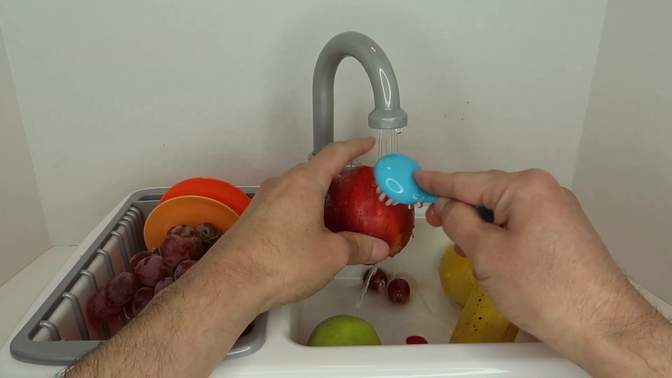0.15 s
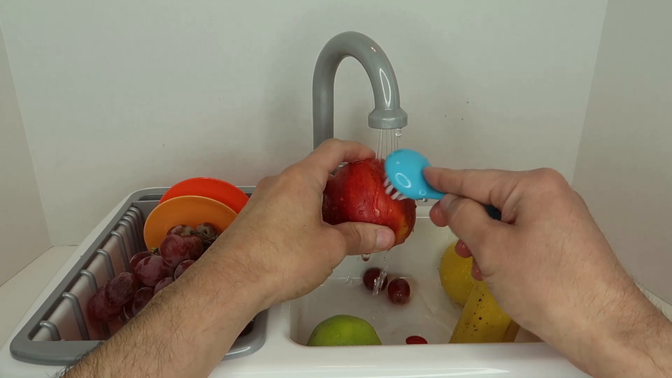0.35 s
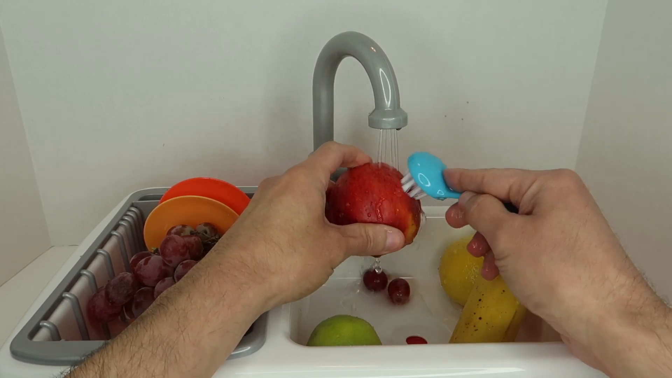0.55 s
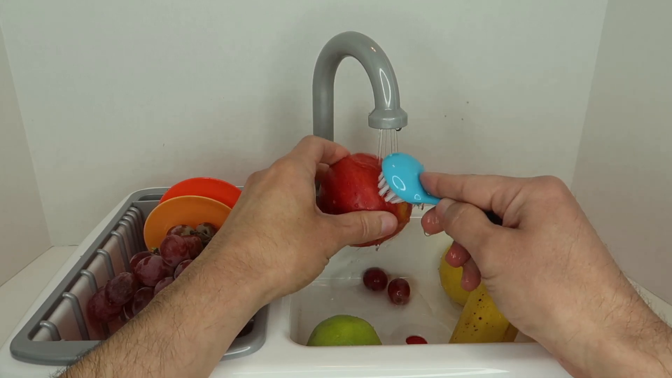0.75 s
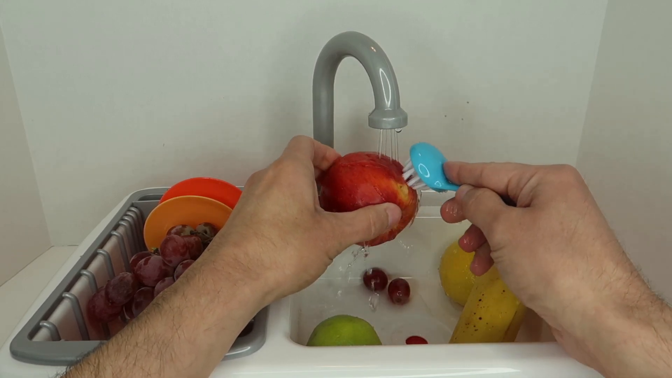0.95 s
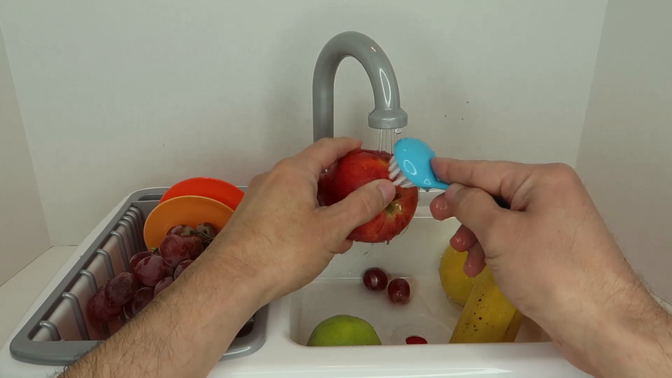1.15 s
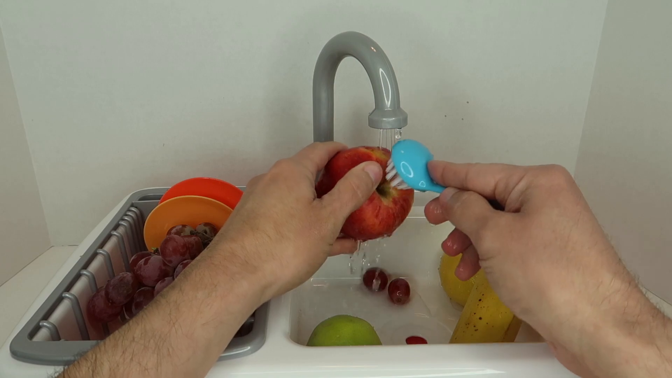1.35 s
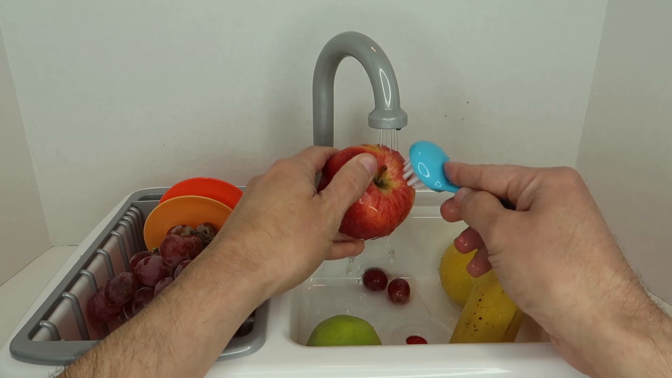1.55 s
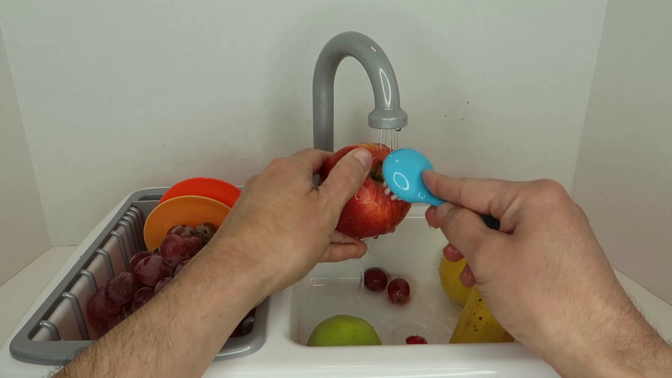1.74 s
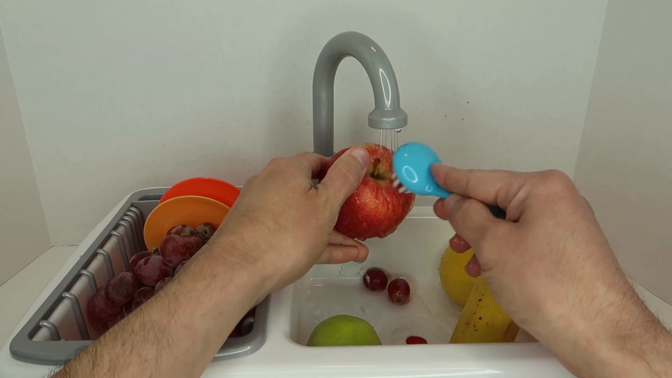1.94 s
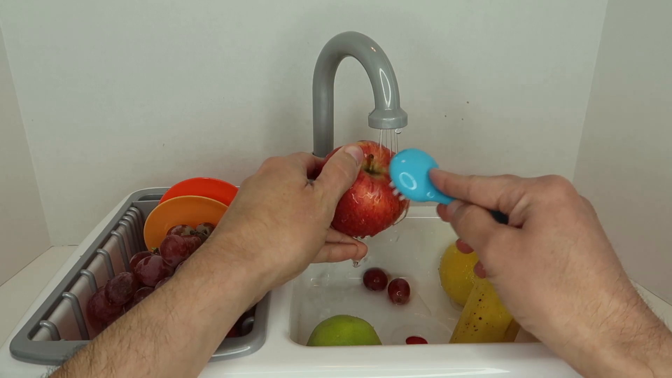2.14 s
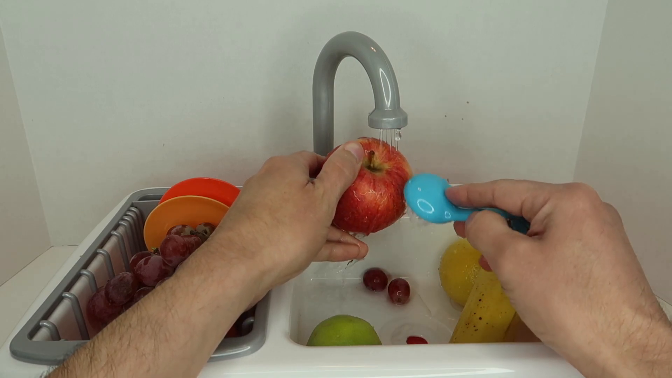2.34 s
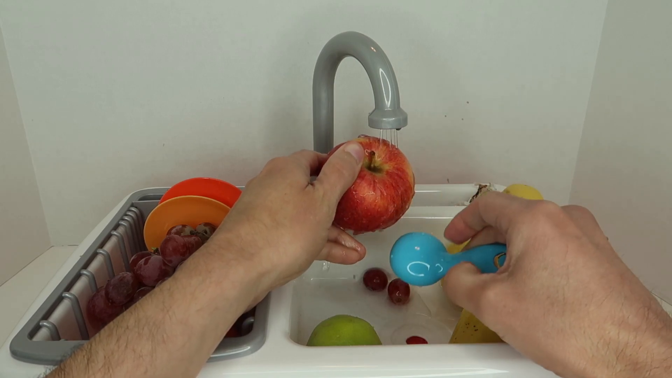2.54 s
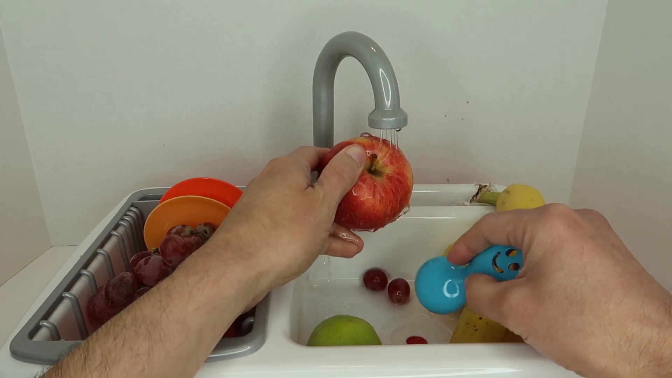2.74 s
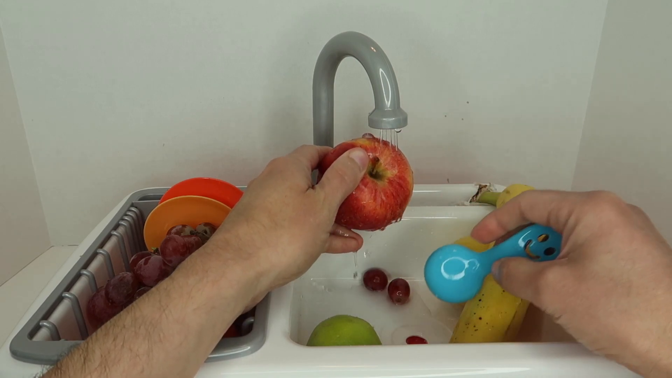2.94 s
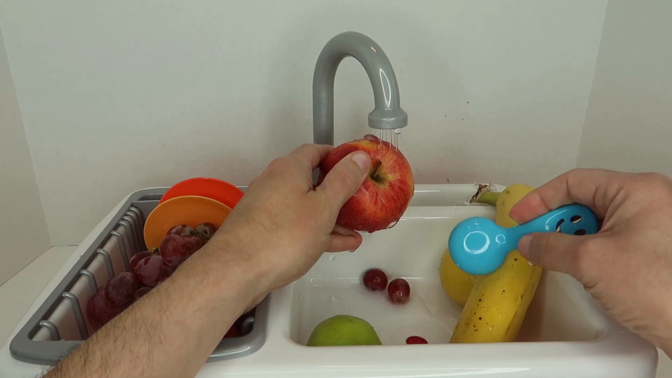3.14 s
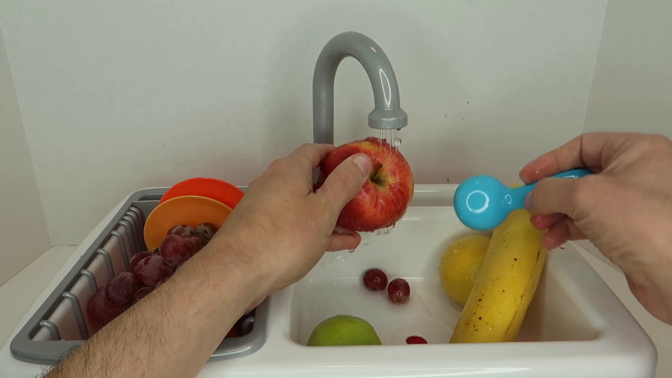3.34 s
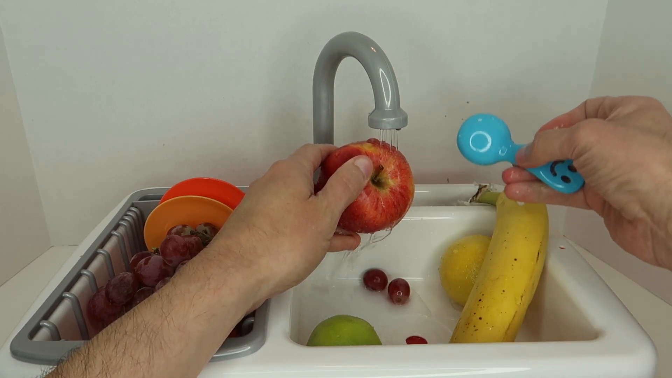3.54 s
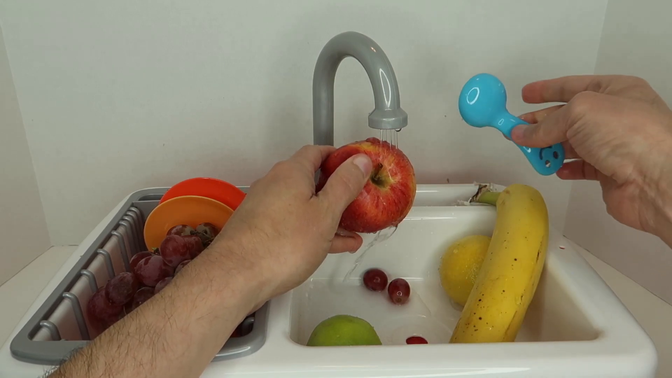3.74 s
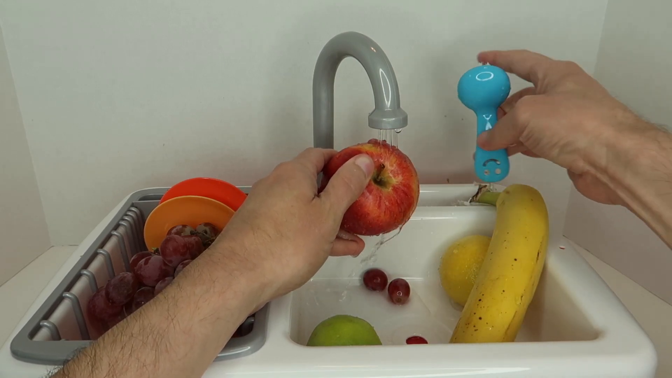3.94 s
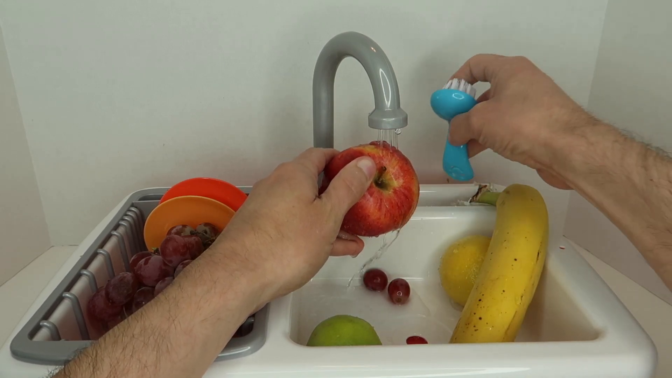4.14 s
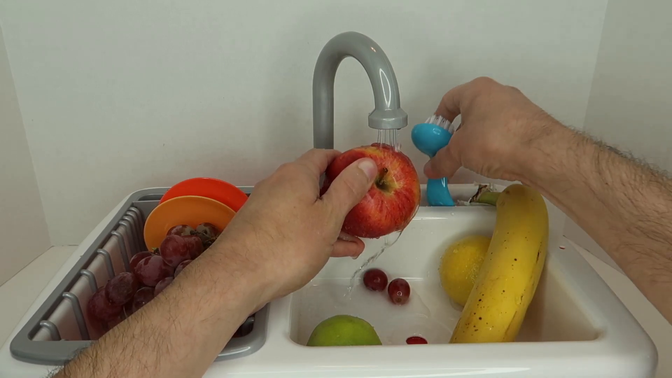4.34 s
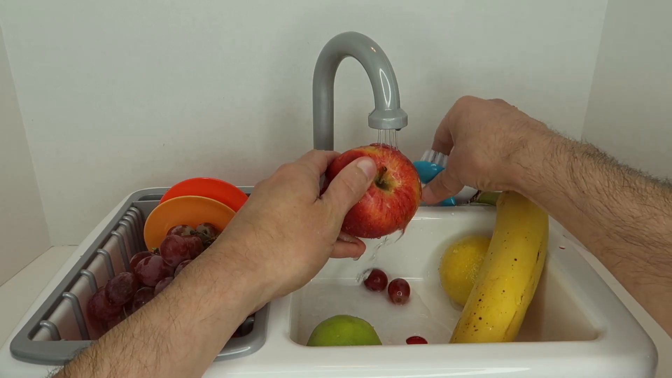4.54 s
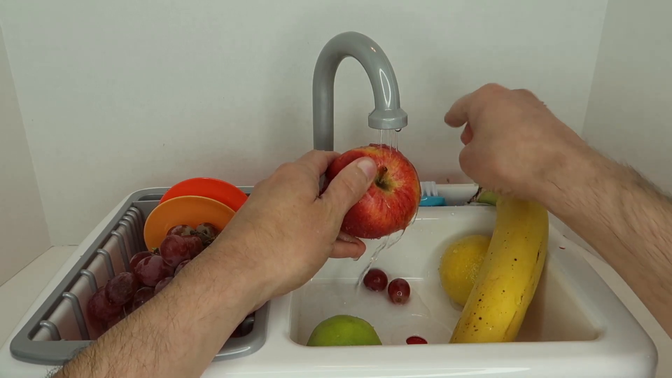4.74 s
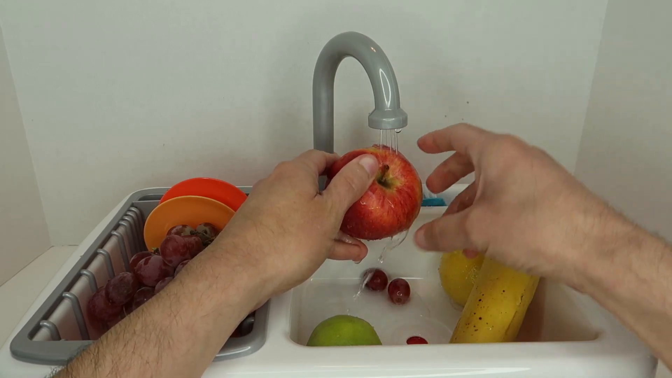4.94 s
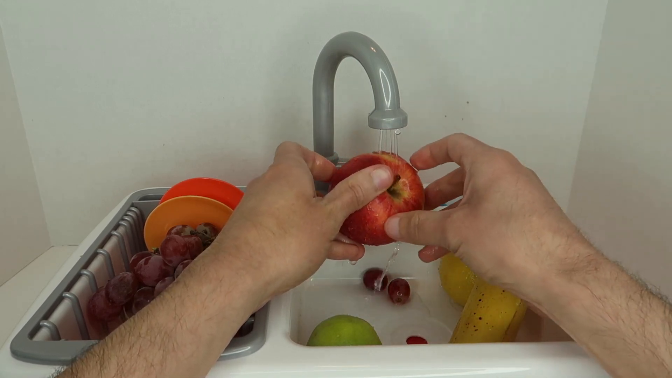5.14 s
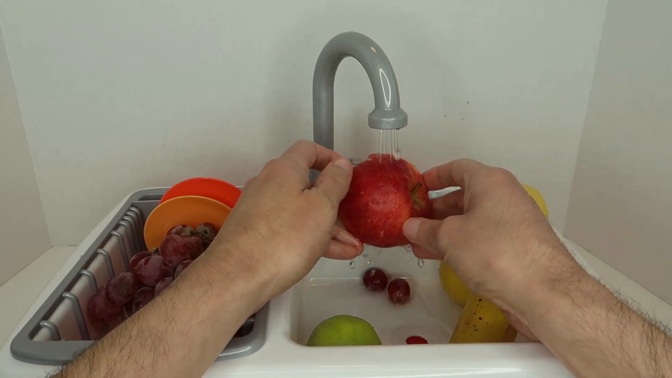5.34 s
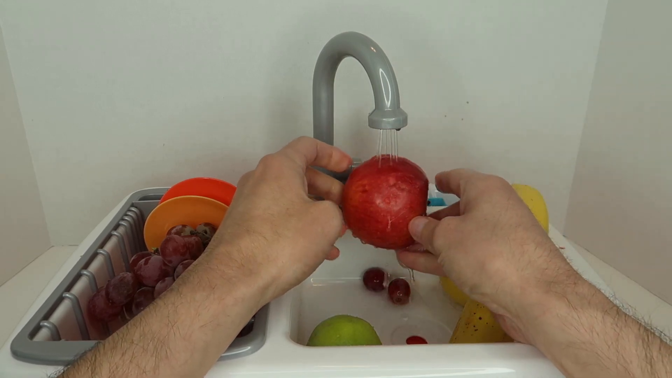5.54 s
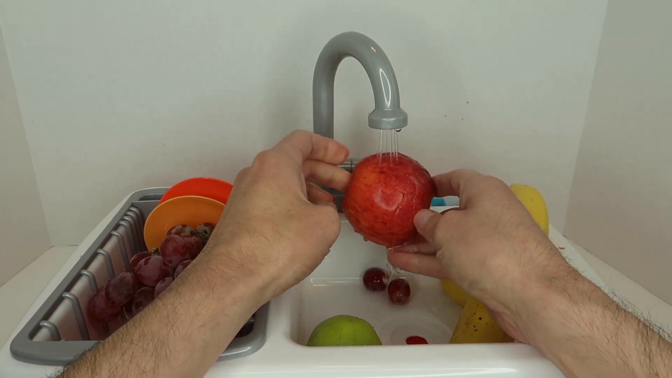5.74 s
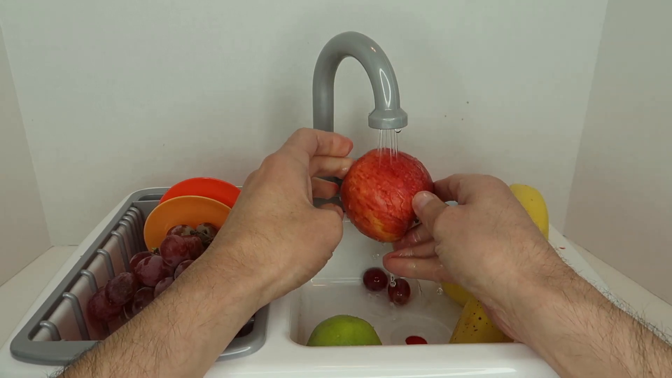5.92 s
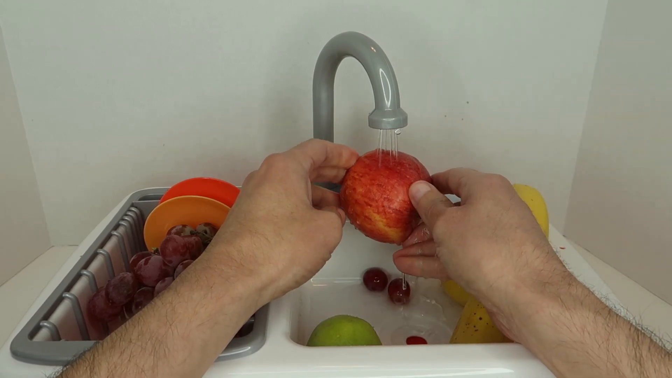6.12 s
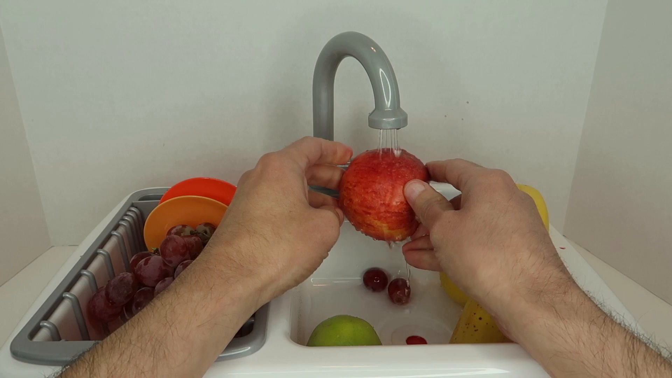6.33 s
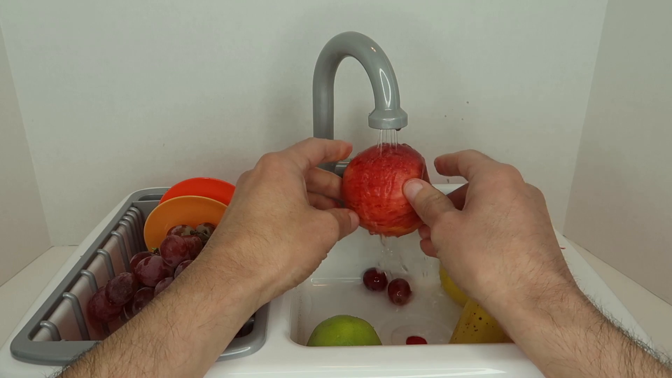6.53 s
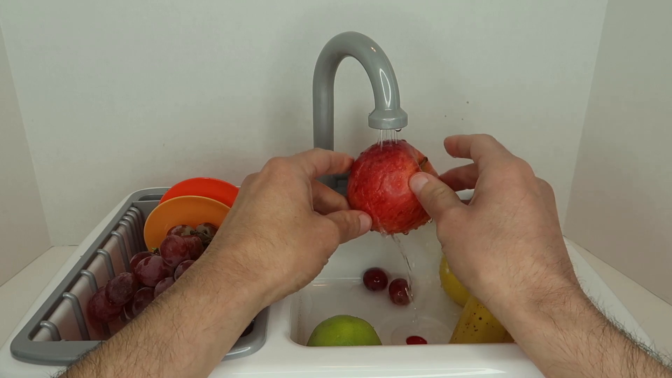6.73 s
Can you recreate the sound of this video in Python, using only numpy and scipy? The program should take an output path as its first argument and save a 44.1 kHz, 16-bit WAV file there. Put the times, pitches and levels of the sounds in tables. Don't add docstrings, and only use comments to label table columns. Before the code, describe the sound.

Quick bristly rasps over a constant little motor buzz and faint water fizz, followed by low rumbles, a loud hollow plastic clack and sparse drips.

```python
import sys
import numpy as np
from scipy import signal
from scipy.fft import rfft, irfft
from scipy.io import wavfile
from scipy.ndimage import uniform_filter1d

SR = 44100
rng = np.random.default_rng(int(sys.argv[2]) if len(sys.argv) > 2 else 0)


def boost_factor(decibels):
    exponent = np.asarray(decibels, float) / 20
    return 10 ** exponent


def bounce(signal):
    frames = np.transpose(np.atleast_2d(signal))
    limited = np.clip(frames, -1, 1)
    pcm = np.round(limited * 32767).astype(np.int16)
    wavfile.write(sys.argv[1], SR, pcm)


N = 303408
TIME = np.arange(N) / SR


def evened(x):
    return x / np.sqrt(np.mean(x ** 2) + 1e-20)


def read(points, hz):
    f, value = np.transpose(points)
    return np.interp(np.log(hz + 1), np.log(f + 1), value)


def level(rows):
    s, db = np.transpose(rows)
    return boost_factor(np.interp(TIME, s, db, left=-120, right=-120))


def swells(rows, rise_db, fall_s, fall_db):
    t = TIME[::40]
    power = np.zeros(len(t))
    for s, db, rise_s in rows:
        slope = np.where(t < s, rise_db / rise_s, -fall_db / fall_s)
        power += boost_factor(2 * (db + slope * (t - s)))
    return np.interp(TIME, t, np.sqrt(power))


def drift(top_hz):
    t = TIME[::200]
    rates = np.geomspace(top_hz / 20, top_hz, 16)
    slow = sum(np.sin(2 * np.pi * (f * t + rng.random())) / np.sqrt(f) for f in rates)
    return np.interp(TIME, t, evened(slow))


def colour(x, points):
    n = x.shape[-1]
    return evened(irfft(rfft(x) * boost_factor(read(points, np.fft.rfftfreq(n, 1 / SR))), n))


def ring(x, hz, width):
    r = np.exp(-np.pi * width / SR)
    return 2 * signal.lfilter([1 - r], [1, -r * np.exp(2j * np.pi * hz / SR)], x).real


def grains(per_s, spread_db):
    size = boost_factor(spread_db * np.minimum(rng.exponential(1, N), 5))
    size = size * (rng.random(N) < per_s / SR)
    return size * rng.standard_normal((2, N))


def patchy(x, depth_db, bins, frames):
    z = signal.stft(x, nperseg=512, noverlap=384)[2]
    patches = uniform_filter1d(rng.standard_normal(z.shape[1:]), bins, 0)
    patches = uniform_filter1d(patches, frames, 1)
    z = z * boost_factor(depth_db * evened(patches))
    return signal.istft(z, nperseg=512, noverlap=384)[1][:, :N]


def add(mix, s, sound):
    part = mix[..., round(s * SR):][..., :sound.shape[-1]]
    part += sound[..., :part.shape[-1]]


# f/Hz, likeness/0-1
LIKENESS = [(30, 1), (70, 0.91), (150, 0.96), (400, 0.82), (1000, 0.85), (2400, 0.75), (6000, 0.31),
            (15000, 0.026)]


def pair(noise, points=LIKENESS):
    z = rfft(noise)
    same = np.clip(read(points, np.fft.rfftfreq(N, 1 / SR)), 0, 1)
    mid = np.sqrt((1 + same) / 2) * z[0]
    side = np.sqrt((1 - same) / 2) * z[1]
    return irfft(np.array([mid + side, mid - side]), N)


# t/s, lead/turns
SHAFT_LEAD = [
    (0.0, 0.034),
    (1.7, 0.021),
    (3.55, 0.112),
    (5.0, 0.036),
    (6.1, 0.016),
    (6.9, 0.021),
]
# multiple of shaft speed, level/dB
PUMP_TONES = [(8, -60), (9, -61), (11, -65), (12, -58), (14, -67), (15, -58), (16, -50), (17, -61),
              (18, -61), (20, -71), (21, -60), (22, -67), (24, -65), (25, -70), (26, -63), (27, -63),
              (29, -70), (31, -64), (32, -70), (35, -69), (36, -67), (51, -67), (57, -64)]
# place/turns, strength/dB, brightness/dB
PUMP_STROKES = [
    (.09, 1, 1),
    (.15, -2, 0),
    (.25, -1, -10),
    (.34, -5, -9),
    (.45, -4, -3),
    (.51, -3, -4),
    (.59, -5, -12),
    (.79, -5, -11),
]
# f/Hz, width/Hz, level/dB
HOUSING_MODES = [(729, 180, -3.5), (1039, 250, -1), (1230, 77, -3), (1470, 143, 2), (1606, 57, -3.5),
                 (1662, 122, -0.5), (1974, 264, -1), (2877, 290, -7.5), (3194, 200, -8.5),
                 (3950, 790, -5.5), (4590, 260, -10), (5590, 780, -8.5), (6860, 410, -20.5)]


def pump():
    shaft_hz, knocking_db = 27.83, -52.5
    turns = shaft_hz * TIME + np.interp(TIME, *np.transpose(SHAFT_LEAD))
    tones = np.zeros(N)
    for k, db in PUMP_TONES:
        tones += boost_factor(db + 1.4 * drift(5.6)) * np.sin(2 * np.pi * (round(k) * turns + rng.random()))
    count = int(turns[-1]) + 2
    loose = rng.standard_normal(N)
    grit = rng.standard_normal(round(SR / shaft_hz) + 1)
    repeating = np.interp(turns % 1, np.linspace(0, 1, len(grit)), grit)
    dull, bright = np.zeros((2, N))
    for place, db, bright_db in PUMP_STROKES:
        since = turns - place + 1
        strength = boost_factor(db + 2.4 * rng.standard_normal(count + 1))
        burst = strength[since.astype(int)] * np.exp(-(since % 1) / 0.045)
        dull += burst
        bright += burst * boost_factor(bright_db)
    drive = .55 * repeating + .8 * loose
    knocks = np.zeros(N)
    for hz, width, db in HOUSING_MODES:
        push = drive * (dull if hz < 2400 else bright)
        knocks += boost_factor(db) * evened(ring(ring(push, hz, width), hz, width))
    return np.sqrt(2) * tones, boost_factor(knocking_db) * evened(knocks)


# t/s of full pressure, pressure/dB, press-in time/s
SCRUB_STROKES = [(0.01, -67.5, .02), (0.155, -63, 0.15), (0.275, -59, 0.095), (0.48, -61, 0.12),
                 (0.64, -63.5, 0.12), (0.81, -61.5, 0.11), (0.95, -59, .06), (1.12, -60, 0.051),
                 (1.28, -62, 0.11), (1.47, -63.5, 0.15), (1.59, -65, 0.056), (1.77, -62, 0.13),
                 (1.92, -63.5, 0.052), (2.065, -59, .03), (2.24, -61.5, .06), (2.37, -68, 0.041)]
# f/Hz, density/dB per Hz
BRISTLE_TONE = [(1470, -33), (2500, -8), (3860, -1.5), (6830, -3.5), (7490, -7.5), (12800, -12),
                (14300, -15), (15400, -25)]
# t/s, level/dB
SPRAY_LEVEL = [
    (2.4, -73),
    (2.71, -67),
    (3.25, -76),
    (3.73, -68),
    (4.18, -72),
    (4.75, -69),
    (5.07, -73),
    (5.87, -75),
    (6.88, -66),
]
# f/Hz, density/dB per Hz
SIZZLE_TONE = [(3000, -2.5), (5000, -3), (8000, -9), (12000, -13.5), (14500, -14.5), (15500, -28)]


def brush_and_spray():
    pressure = swells(SCRUB_STROKES, rise_db=19, fall_s=.1, fall_db=14)
    bristles = colour(patchy(grains(12000, 0.87), 2.4, bins=12, frames=5), BRISTLE_TONE)
    droplets = colour(patchy(grains(5000, 2.04), 2.7, bins=20, frames=6), SIZZLE_TONE)
    flicks = boost_factor(9.5) * pressure * bristles
    fizz = boost_factor(6.0) * level(SPRAY_LEVEL) * droplets
    return pair(flicks + fizz)


# t/s, level/dB, f/Hz
DRIPS = [(0.358, -32, 6300), (0.797, -35, 5400), (1.8841, -41, 6860), (2.2975, -34, 8100),
         (2.328, -35.5, 3940), (2.4653, -50, 9200), (2.5117, -50, 8270), (2.5795, -37, 8450),
         (2.7964, -46, 7240), (3.5443, -42, 3760), (3.6197, -44, 10100), (3.6735, -46, 7600),
         (3.886, -41, 3300), (4.1445, -49, 13800), (5.096, -37, 12900), (5.3322, -38, 11300),
         (5.752, -41.5, 11300), (5.8028, -45, 3020), (6.0013, -48, 7180), (6.27, -40, 7740),
         (6.5505, -39, 4050), (6.566, -46, 11900), (6.584, -46, 7700), (6.6273, -45, 7600),
         (6.6932, -47, 7900), (6.714, -26.5, 5730), (6.733, -41, 8340), (6.799, -40.5, 7900),
         (6.8394, -46, 10500), (6.855, -44, 9800)]


def drops():
    out, t = np.zeros(N), np.arange(900) / SR
    chance = rng.standard_normal((len(DRIPS), 2, len(t)))
    for (s, db, hz), (near, wide) in zip(DRIPS, chance):
        spread_hz = 360 + 0.078 * hz
        bubble = np.sin(2 * np.pi * hz * (t + 5.5 * t ** 2)) * np.exp(-t * spread_hz * 0.94)
        splash = evened(ring(ring(near, hz, 1.7 * spread_hz), hz, 2.3 * spread_hz))
        splash = splash * np.exp(-t / 0.0037)
        tick = colour(wide, SIZZLE_TONE) * np.exp(-t / 0.0073)
        onset = 1 - np.exp(-t / 0.00037)
        add(out, s, boost_factor(db) * (0.84 * bubble + 0.5 * splash + 0.24 * tick) * onset)
    return out


# f/Hz, density/dB per Hz
CRACK_TONE = [(1200, -16), (2500, 3), (4100, 8), (6000, 1.5), (8000, -1.5), (12000, -15.5), (15000, -40)]
# f/Hz, width/Hz, level/dB
CRACK_MODES = [(2160, 140, 4), (2600, 350, 3), (3590, 190, 4), (4700, 150, -13), (5740, 280, -9)]


def blows(rows, modes, ring_ms):
    out, t = np.zeros(N), np.arange(5000) / SR
    chance = rng.standard_normal((len(rows), 3, len(t)))
    for (s, db, hz, bright_db, contact_ms), (push, crack, tick) in zip(rows, chance):
        contact = np.exp(-t * 1000 / max(contact_ms, .2)) * (1 - np.exp(-t / 0.00004))
        force = uniform_filter1d(push, 5) * contact
        body = sum(boost_factor(d) * ring(force, f, 1.95 / t60) * np.sqrt(t60) for f, d, t60 in modes)
        fade = np.exp(-t * 1000 / max(ring_ms * boost_factor(-0.09 * (db - 1)), .5))
        after_ring = 0.13 * fade ** 0.43
        note = np.sin(2 * np.pi * hz * t) * (fade + after_ring) * (1 - np.exp(-t / 0.0007))
        low = body / abs(body).max() * 0.82 + note * 0.76
        high = boost_factor(bright_db - 4.5) * colour(crack, CRACK_TONE)
        high = high + boost_factor(2 * bright_db + 2.0) * colour(tick, SIZZLE_TONE) * contact
        partials = sum(boost_factor(d) * ring(crack * contact, f, w) for f, w, d in CRACK_MODES)
        partials = boost_factor(0.64 * bright_db - 7.5) * partials / abs(partials).max()
        add(out, s, boost_factor(db) * (low + high * contact + partials))
    return out


# t/s, peak level/dB, f/Hz, brightness/dB, contact/ms
RIM_HITS = [(4.438, -23.5, 990, -11, 4.8), (4.572, -36.5, 465, -5.5, 5.3), (4.669, -14, 1143, -12.5, 6.3),
            (4.674, -18.5, 522, -36, 13), (4.78, -7.5, 1240, -25, 2.1), (4.784, -4, 550, -26, 6.4),
            (4.795, 9.5, 1230, -39, 3.5), (4.798, 0, 526, -9.5, 4), (4.809, -21, 507, -31, 3.6),
            (4.824, -5.5, 1260, -36, 3.6), (4.832, -12.5, 522, -12, 6.5), (4.869, -21.5, 1230, -13, 7.2),
            (4.876, -6.5, 496, -13.5, 3.5), (5.093, -28.5, 460, -12.5, 5.3), (4.443, -24, 1040, -40, 1.2),
            (4.490, -32, 1030, -40, 1), (4.670, -19.5, 230, -40, 2.2), (4.880, -11, 342, -40, 2)]
# f/Hz, level/dB, t60/s
RIM_MODES = [(255, -11, 0.084), (332, -8.5, 0.08), (522, 0.5, 0.024), (613, -0.5, 0.016), (830, -15, 0.013),
             (950, 2, 0.025), (1056, 6.5, 0.041), (1170, 7.5, 0.032), (1310, -5.5, 0.021),
             (1613, 0.5, 0.022), (2240, -7.5, 0.013), (2600, -36, 0.02), (3670, -6, 0.02), (4740, -35, .03)]


def rim_knocks():
    return blows(RIM_HITS, RIM_MODES, ring_ms=3.54)


# t/s, peak level/dB, f/Hz, brightness/dB
APPLE_TAPS = [
    (0.27, -27.5, 830, -5.5),
    (0.481, -30.5, 750, -7.5),
    (0.68, -42, 730, -5),
    (0.795, -37.5, 1170, -3),
    (1.094, -50, 580, -15),
    (2.048, -46, 872, -6),
    (2.558, -33.5, 729, -23),
    (3.66, -33, 620, -13),
    (4.204, -39.5, 740, -18),
]


def apple_taps():
    # f/Hz, level/dB, t60/s
    peel = [(407, 1, 0.042), (690, -19, 0.022), (930, 12.5, 0.0048), (1780, 2, 0.008),
            (2310, -25, 0.06), (5900, 9, 0.011)]
    contact_ms = 4.9
    return blows([(*tap, contact_ms) for tap in APPLE_TAPS], peel, ring_ms=4.5)


# t/s, level/dB
CHATTER_LEVEL = [
    (4.806, -17),
    (4.812, -25),
    (4.868, -33),
    (4.884, -25.5),
    (4.905, -38),
    (4.96, -45),
]
# f/Hz, density/dB per Hz
CHATTER_COLOUR = [(88, -49), (150, -26), (503, -1), (713, 5), (1310, -8), (1480, -16), (2620, -4),
                  (3150, -35), (3640, -32), (4300, -34), (12000, -48), (15600, -76.5), (22000, -120)]


def chatter():
    return boost_factor(-1.0) * level(CHATTER_LEVEL) * colour(grains(2500, 4.0)[0], CHATTER_COLOUR)


# t/s, strength/dB, lean-in time/s, sway f/Hz
NUDGES = [(3.81, -46.5, .1, 45), (3.99, -42, .05, 55), (4.1, -36, 0.061, 44), (4.205, -34.5, .05, 47),
          (4.335, -36.5, .06, 66), (4.41, -36.5, 0.048, 79.7), (4.54, -37.5, 0.07, 46),
          (4.665, -35.5, 0.057, 55.5), (4.79, -38, 0.074, 60), (4.91, -33, 0.088, 55.3),
          (5.005, -44, .03, 50)]
# f/Hz, density/dB per Hz
STAND_TONE = [(20, -25), (45, 12.5), (90, 8.5), (200, -5), (400, -4.5), (700, -49)]


def stand():
    lean_db, settle_s, settle_db = 10, 0.048, 11.5
    sway = np.zeros(N)
    span = slice(round(3.5 * SR), round(5.4 * SR))
    for row, turn in zip(NUDGES, rng.random(len(NUDGES))):
        lean = swells([row[:3]], lean_db, settle_s, settle_db)[span]
        sway[span] += lean * np.sin(2 * np.pi * (row[3] * TIME[span] + turn))
    push = swells([row[:3] for row in NUDGES], lean_db, settle_s, settle_db)
    shudder = pair(push * colour(rng.standard_normal((2, N)), STAND_TONE))
    return boost_factor(-2) * sway + boost_factor(-1.5) * shudder


# f/Hz, left lead/radians
PORT_LEAD = [(2000, -0.06), (3000, -0.2), (3700, -0.79), (7000, -0.87), (8600, -1.3), (12000, -0.9),
             (15000, -2.3)]


def ports(x):
    half = np.exp(.5j * read(PORT_LEAD, np.fft.rfftfreq(N, 1 / SR)))
    return irfft(rfft(x) * np.array([half, 1 / half]), N)


# f/Hz, t60/s
CORNER_DECAY = [(100, 0.092), (500, 0.39), (1500, 0.34), (5000, 0.28), (12000, 0.3)]
# f/Hz, likeness/0-1
ECHO_LIKENESS = [(100, .98), (1000, 1), (2400, 0.81), (6000, .4), (15000, .05)]


def corner(x):
    taps = np.zeros((2, SR // 2))
    jitter = rng.integers(0, 20, (2, (SR // 2 - 141) // 20))
    at = np.arange(140, SR // 2 - 20, 20) + jitter
    np.put_along_axis(taps, at, rng.choice([-1., 1.], at.shape), 1)
    hz, t, z = signal.stft(taps, SR, nperseg=256)
    decay = boost_factor(-60 * t / read(CORNER_DECAY, hz)[:, None])
    tail = signal.istft(z * decay, SR, nperseg=256)[1]
    tail = tail / np.linalg.norm(tail[0])
    return pair(signal.fftconvolve(x[None], tail, axes=1)[:, :N], ECHO_LIKENESS)


# f/Hz, density/dB per Hz
WASH_TONE = [(12, -44), (20, -0.5), (70, -10.5), (119, -11), (166, -0.5), (281, -7), (382, -2.5), (439, -5),
             (630, -10), (1330, -14.5), (1450, -17), (2600, -19.5), (5670, -30.5), (11700, -42),
             (15400, -63)]


def wash():
    frames, hz = N // 256 + 5, np.fft.rfftfreq(1024, 1 / SR)
    a, b, patches = rng.standard_normal((3, 2, 513, frames))
    patches = evened(uniform_filter1d(uniform_filter1d(patches[0], 10, 0), 10, 1))
    z = (a + 1j * b) * boost_factor(read(WASH_TONE, hz)[:, None] + 2.65 * patches)
    noise = signal.istft(z, nperseg=1024, noverlap=768)[1][:, :N]
    return boost_factor(-47) * pair(evened(noise))


def hum():
    turn = np.pi * 120.2 * TIME
    main = boost_factor(-49.5 + 1.1 * drift(13)) * np.sin(2 * turn)
    low = boost_factor(-60.5 + 3.3 * drift(3.1)) * np.sin(turn)
    return np.sqrt(2) * (main + low)


def scene():
    tones, rattle = pump()
    water = drops()
    knocks = rim_knocks() + apple_taps() + chatter()
    near = ports(knocks + rattle + water) * boost_factor([[-.4], [.4]]) + tones + hum()
    echoes = corner(boost_factor(-13.5) * knocks + boost_factor(-7) * rattle + boost_factor(-15) * water)
    return near + echoes + stand() + wash() + brush_and_spray()


def band_limit(x):
    return signal.sosfilt(signal.butter(12, 15600, fs=SR, output="sos"), x)


def record(dry):
    power_db = 10 * np.log10(abs(uniform_filter1d((dry ** 2).mean(0), 600)) + 1e-12)
    release_db = TIME * 8.5
    held_db = np.maximum.accumulate(0.42 * (power_db + 21) + release_db)
    over_db = np.maximum(held_db - release_db, 0)
    late_db = signal.lfilter([.0015], [1, -(1 - .0015)], over_db)
    limited = np.clip(1.1 * np.tanh(dry / boost_factor(late_db) / 1.1), -1, 1)
    edge = signal.firwin(255, 15750, window=("kaiser", 8), fs=SR)
    return band_limit(signal.oaconvolve(limited, edge[None], "same"))


dry = scene()
out = record(dry)
bounce(out)
```